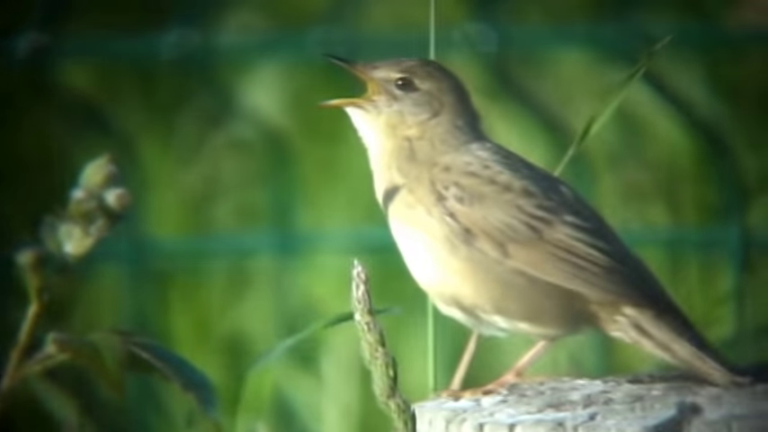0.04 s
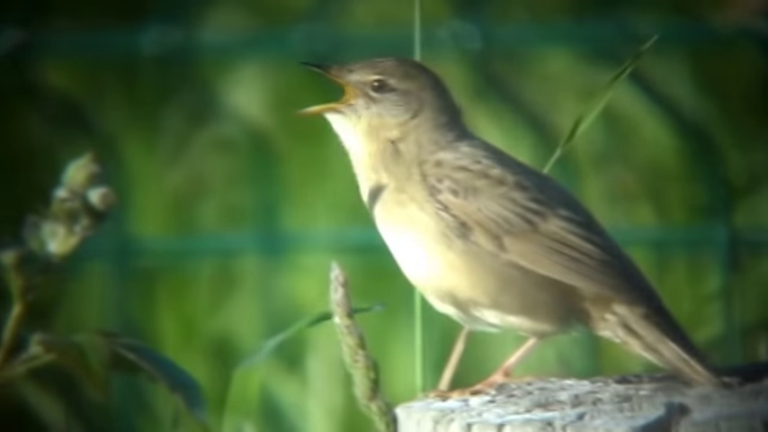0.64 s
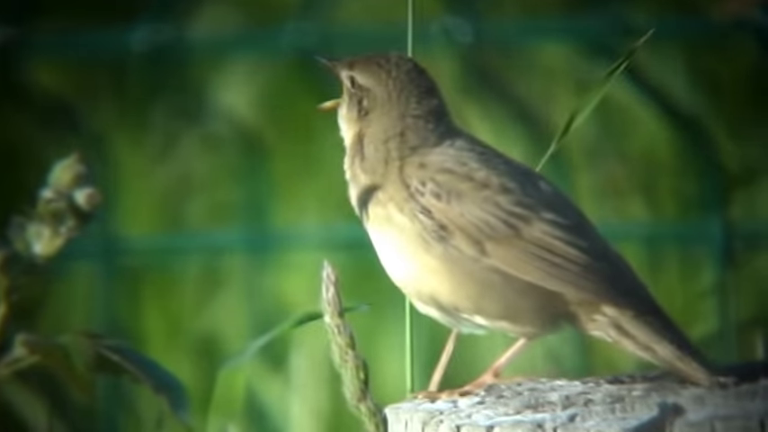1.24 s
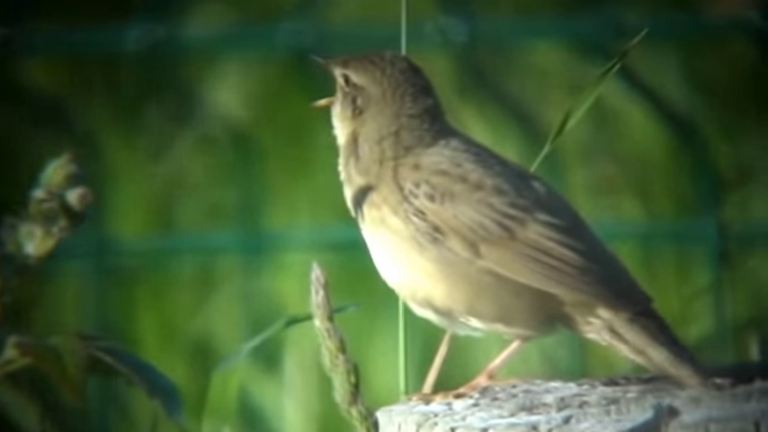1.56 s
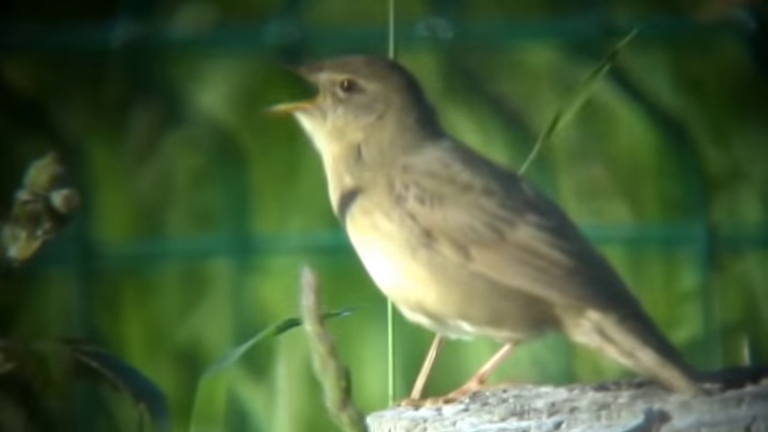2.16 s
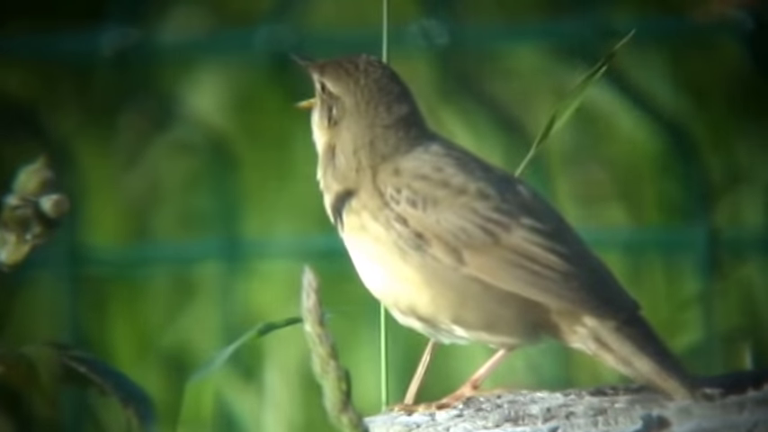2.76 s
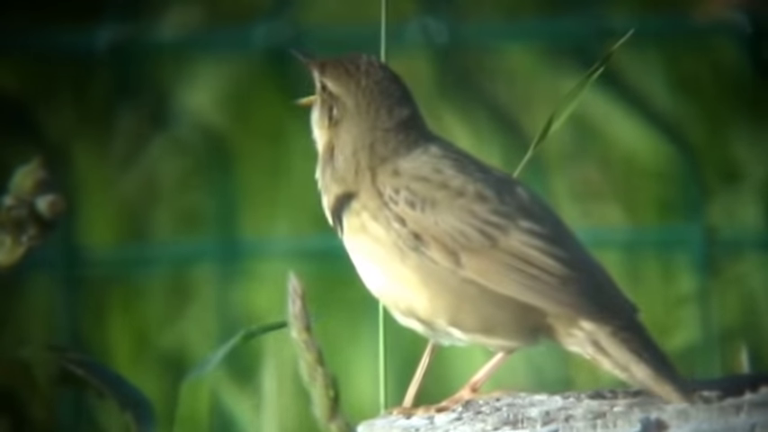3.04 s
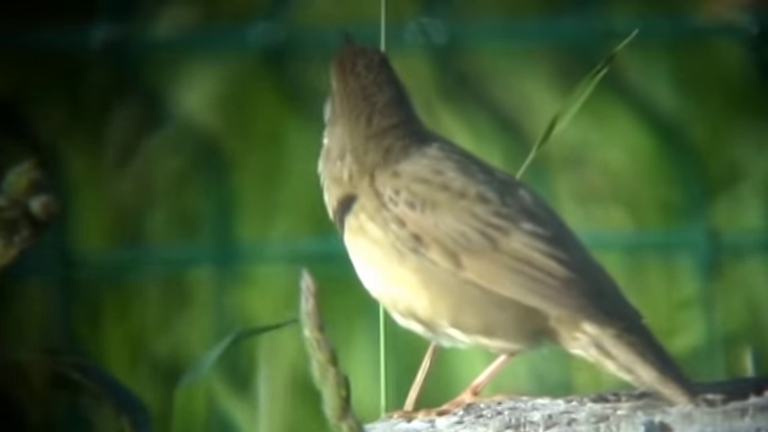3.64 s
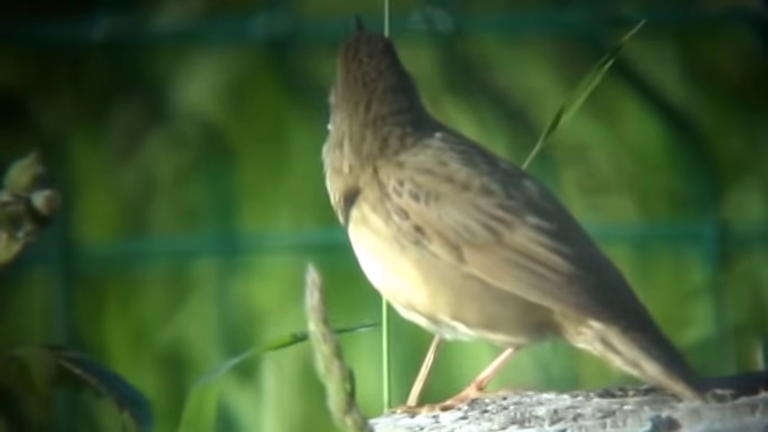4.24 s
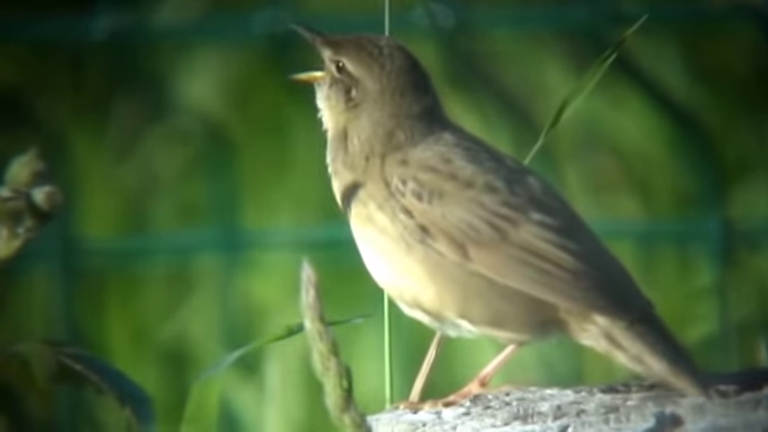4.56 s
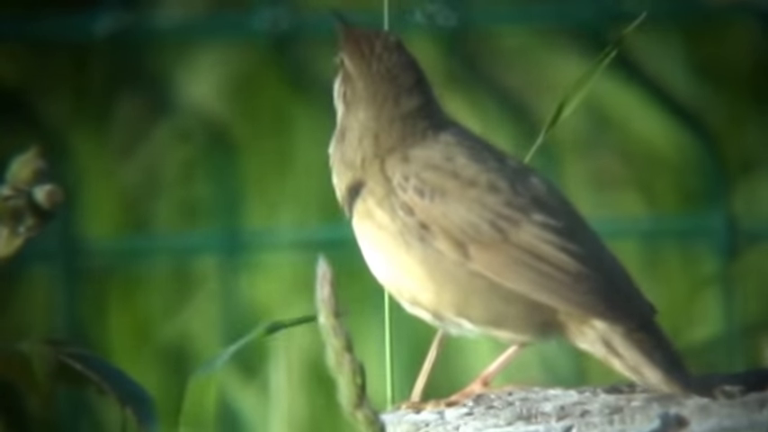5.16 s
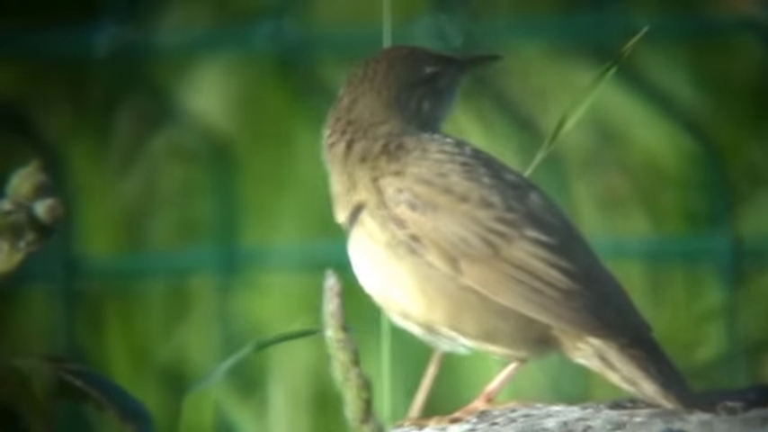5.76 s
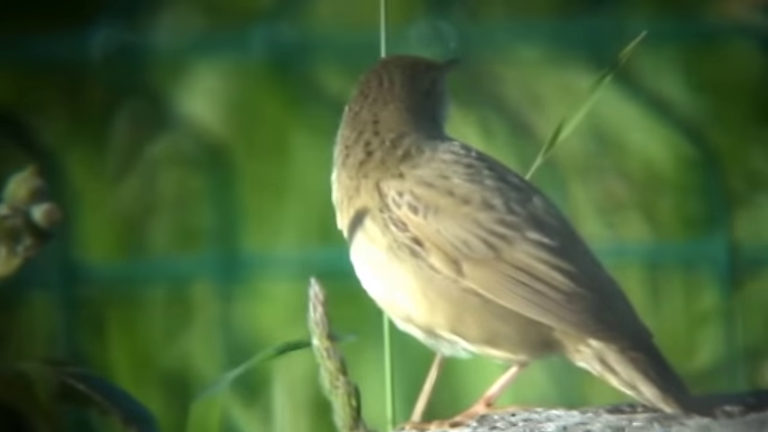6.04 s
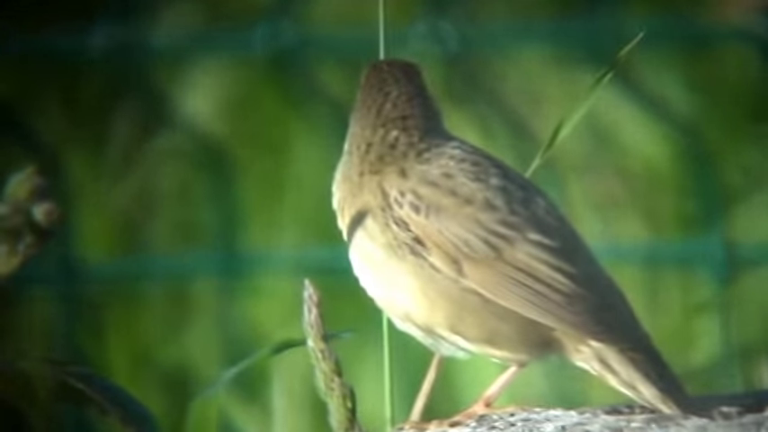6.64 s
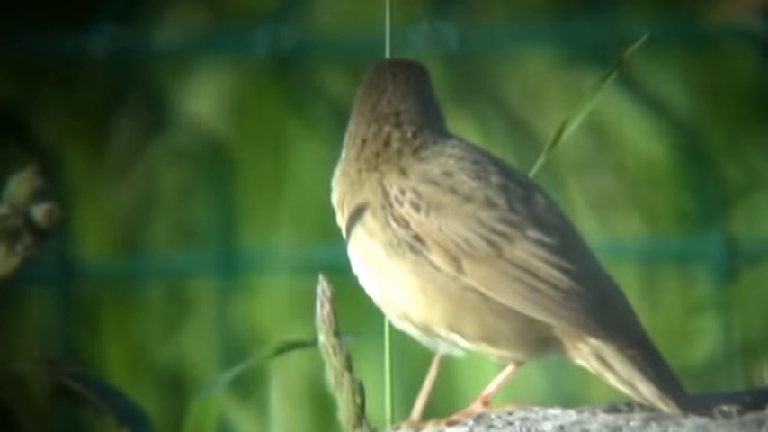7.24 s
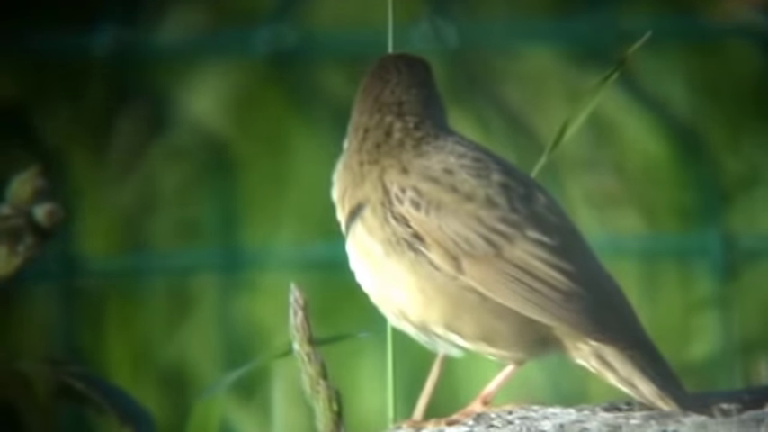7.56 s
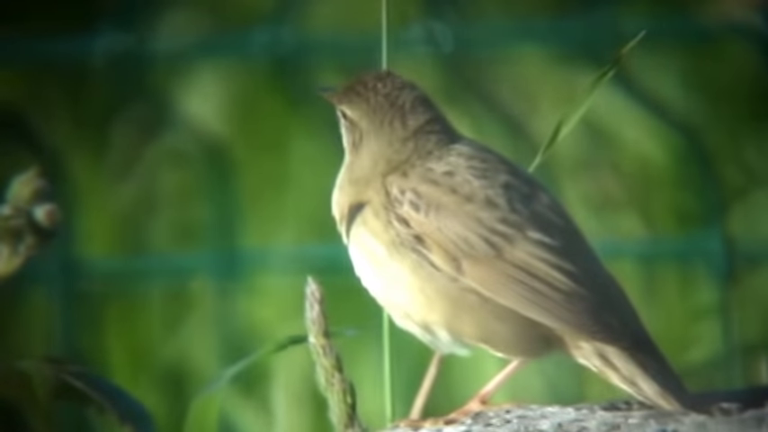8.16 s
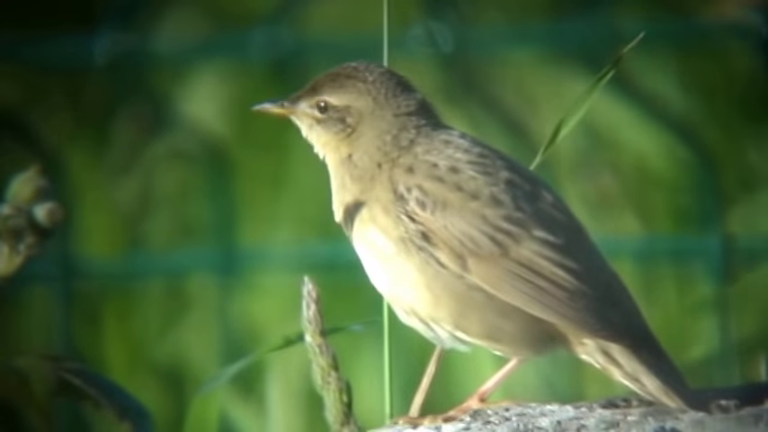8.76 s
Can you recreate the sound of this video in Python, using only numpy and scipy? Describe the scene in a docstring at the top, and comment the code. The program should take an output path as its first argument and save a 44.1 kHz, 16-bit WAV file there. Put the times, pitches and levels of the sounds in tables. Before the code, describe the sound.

From the very start, a small warbler sings close by in a meadow: a high, fast, unbroken trill of tiny ticks, even and mechanical like an insect or a spinning reel. It softens slightly after the first second but keeps its pace. At about 1.6 seconds a single sharp, dry knock sounds nearby, a little to the right, and a much fainter one follows at about 2.7 seconds. The trill stops at about 5.4 seconds. Other birds call faintly far away throughout, with short rising chirps, falling whistles and small twitters near 4.6 and 5.9 seconds, continuing until about 8 seconds. Under everything lie a low distant rumble, a soft steady wash of open air and faint microphone hiss. The rumble swells slightly around 7.5 and 8 seconds, and this quiet background lasts to the end at about 9 seconds.

```python
"""Warbler reeling in a meadow.

A warbler's syrinx pulses out 27 syllables a second, each a sharp rising tick and a short falling note.
The song scatters off the plants and stops after 5.4 s. Other birds whistle far off. Something knocks
nearby, then again faintly. Under it all: distant rumble, open-air wash, faint microphone hiss and whine."""
import sys
import numpy as np
from scipy import signal
from scipy.fft import rfft, irfft, next_fast_len
from scipy.io import wavfile

SR = 44100
rng = np.random.default_rng(int(sys.argv[2]) if len(sys.argv) > 2 else 0)


def store_pcm(level_fs):
    """Save levels as 16-bit WAV."""
    pcm = np.round(np.clip(level_fs, -1, 1) * 32767).astype(np.int16)
    wavfile.write(sys.argv[1], SR, np.atleast_2d(pcm).T)


N = 396459
TIME_S = np.arange(N) / SR

# tick gesture: offset_s, pitch_hz, gain_db
TICK = [(-.0013, 3850, -30.5), (-.00085, 4770, -11), (-.00045, 6500, -2), (0, 6700, -1.5),
        (.00045, 6850, -3.5), (.00085, 7000, -9.5), (.0012, 8000, -20), (.0018, 8300, -44)]
# note gesture: offset_s, bend_hz, gain_db
NOTE = [(-.0007, 400, -29), (-.0001, 256, -1), (.0006, 117, 1), (.002, 42, 3), (.0033, -70, -2),
        (.0044, -230, -8), (.0058, -320, -21.5)]
# tick tuning, sinking late in the song: time_s, shift_hz
TICK_SHIFT = [(0, -32), (.5, 68), (1.2, -33), (2.3, 33), (3.7, -73), (4.1, -200), (4.7, -130), (5.4, -130)]
# note tuning, sagging at the end: time_s, pitch_hz
NOTE_PITCH = [(0, 5890), (.7, 5940), (1.4, 5870), (2.4, 5940), (3.9, 5870), (4.25, 5830), (4.5, 5880),
              (5.4, 5800)]
# reel rate: time_s, syllables_per_s
PACE = [(0, 27.59), (.68, 27.44), (.7, 27.69), (2.57, 27.29), (2.6, 27.52), (4.12, 27.2), (4.85, 27.44),
        (5.08, 27.35), (5.4, 26.56)]
# song level, dipping as the beak turns away: time_s, tick_db, note_db
SONG_LEVEL = [(0, -32.5, -38), (.31, -29, -37.5), (1.05, -31, -37.7), (1.22, -34.4, -39.9),
              (1.55, -34.5, -41), (2.11, -31.5, -37.5), (2.6, -32, -38), (2.679, -33.5, -39),
              (3.5, -33, -38.5), (4.411, -33, -37), (4.94, -33.9, -39.5), (5.15, -33, -38),
              (5.4, -33.5, -40)]
# forward-beamed octave, fading as the head turns: time_s, gain_db
OCTAVE_BEAM = [(1.0, -1), (1.3, -3.5)]
# return from the plants, growing as the head turns: time_s, gain_db
PLANT_SCATTER = [(0, -17), (1.1, -14.5), (2.5, -13.5), (4, -11), (5.4, -10.5)]

# far contact calls, upward hooks: start_s, start_hz, level_db
HOOKS = [(.575, 3480, -69.5), (2.095, 3560, -68), (2.887, 3430, -69), (5.42, 3430, -74), (6.08, 3520, -76),
         (6.175, 3420, -68), (6.723, 3780, -74), (7.04, 3410, -71), (7.15, 3410, -73), (7.28, 4430, -78),
         (7.57, 3750, -73.5), (7.98, 3430, -77), (8.08, 4400, -76)]
# far falling slurs: start_s, length_s, start_hz, end_hz, level_db
SLURS = [(.38, 0.2, 5200, 4300, -74), (2.249, 0.17, 3950, 2950, -74), (2.98, .15, 4900, 4200, -73),
         (3.582, .17, 4600, 3130, -72), (4.324, 0.11, 4960, 4500, -73), (4.821, .26, 4550, 2870, -68),
         (5.575, .17, 5050, 4280, -68.5)]
# far held notes, flat-topped arches: start_s, length_s, top_hz, level_db
ARCHES = [(3.087, .08, 4040, -73), (3.19, .065, 4020, -71.5), (3.286, 0.064, 4040, -73),
          (3.5, .1, 3150, -69), (3.859, .175, 3220, -67.5), (4.09, .11, 3090, -71)]
# far twitters: start_s, level_db
TWITTERS = [(4.648, -61), (5.923, -64)]
# pips of one twitter: pitch_hz, gain_db
PIPS = [(3660, -2), (3740, -2), (3380, 1), (3150, 1), (2870, -5)]

# knocks: start_s, level_db
KNOCKS = [(1.5983, -25), (2.696, -41)]
# modes of the knocked object: freq_hz, gain_db, t60_s
KNOCK_MODES = [(470, -40, .04), (652, -9.5, 0.043), (926, 3.5, 0.02), (1250, 4, 0.0097), (1480, -3, 0.013),
               (2510, -8, 0.0049)]

# distant rumble spectrum: freq_hz, relative_db
RUMBLE = [(18, -44), (35, -14), (60, -4), (100, -0.5), (135, 0.5), (175, -4.5), (220, -12.5), (280, -9),
          (380, -22.5), (700, -45.5)]
# rumble swells: centre_s, half_width_s, rise_db
RUMBLE_SWELLS = [(2.0, .2, 2.5), (7.488, 0.071, 3.5), (8.05, 0.095, 4.5)]
# open-air wash spectrum: freq_hz, relative_db
WASH = [(200, -8.5), (420, -2), (540, -2), (700, -1), (930, 3), (1150, -2.5), (1500, -5.5), (2000, -9),
        (2800, -15), (4000, -19), (7000, -33)]
# wash envelope: time_s, level_db
WASH_LEVEL = [(0.0, -55.5), (1.0, -55.5), (1.78, -56.5), (3.88, -55.5), (7.34, -58), (8.99, -57.5)]
# far drones: centre_s, half_width_s, centre_hz, bandwidth_hz, level_db
DRONES = [(0.395, 1.6, 1800, 391, -69), (.7, 0.49, 907, 69.4, -64.5), (4.5, 1.5, 654.5, 43.5, -63),
          (6.9, 0.79, 462, 41.2, -67.5), (8.15, 0.99, 1260, 110, -65.5), (8.2, 1, 2050, 200, -70.5)]
# likeness of outdoor noise between the ears: freq_hz, coherence
AIR_COHERENCE = [(75, .94), (140, .98), (300, .83), (600, .6), (1100, .3), (2000, .1), (5000, .05)]
# balance of outdoor noise: freq_hz, left_minus_right_db
AIR_BALANCE = [(100, -0.2), (300, 0), (700, -1.5), (1200, -4.5), (2500, -4.5), (5000, -0.5)]

# hiss common to both channels: freq_hz, relative_db
COMMON_HISS = [(2000, -4.5), (6000, -2), (9000, 2.5), (12500, 5.5), (13500, 4), (16000, -3.5)]
# hiss of each channel alone: freq_hz, relative_db
CHANNEL_HISS = [(2500, -2), (5000, 4), (8000, 4.5), (11000, -2), (12500, -35), (16000, -33)]
# electronic tone comb: freq_hz, level_db
WHINE = [(5000, -89), (6000, -87), (7000, -89), (8000, -91), (9000, -92), (10000, -89), (11000, -84),
         (12000, -80), (13000, -83), (14000, -89)]


def warbler(note_lag_s=0.01, lag_spread_s=0.00015, ground_s=0.00749, ground_db=-21):
    """Alternating ticks and notes, with a weak ground echo and a short haze from the plants."""
    ticks, notes = np.zeros((2, N))
    knots_s, tick_curve_db, note_curve_db = np.transpose(SONG_LEVEL)
    for start_s in syllable_times():
        tick_db = np.interp(start_s, knots_s, tick_curve_db) + rng.normal(0, 0.9)
        note_db = np.interp(start_s, knots_s, note_curve_db) + rng.normal(0, 0.46)
        shift_hz = at_time(TICK_SHIFT, start_s) + rng.normal(0, 40)
        note_hz = at_time(NOTE_PITCH, start_s) + rng.normal(0, 45)
        note_s = start_s + rng.normal(note_lag_s, lag_spread_s)
        beam_db = at_time(OCTAVE_BEAM, start_s)
        tick = syrinx_pulse(TICK, shift_hz, tick_db, octave_db=beam_db - 21, waver_hz=99, rough=0.07)
        note = syrinx_pulse(NOTE, note_hz, note_db, octave_db=beam_db - 21.5, waver_hz=52.6, rough=0.09)
        add(ticks, start_s + TICK[0][0], tick)
        add(notes, note_s + NOTE[0][0], note)
    direct = ticks * pan(balance_db=-1.3) + notes * pan(balance_db=4.5)
    haze = from_db(at_time(PLANT_SCATTER)) * scatter(ticks + from_db(2) * notes, t60_s=0.19, gap_s=0.0021)
    return direct + haze + from_db(ground_db) * delayed(ticks + notes, ground_s)


def syllable_times(first_s=0.0005, end_s=5.42):
    """One syllable per cycle of the reel."""
    t = TIME_S[TIME_S < end_s]
    cycles = np.cumsum(at_time(PACE, t)) / SR
    return first_s + np.interp(np.arange(int(cycles[-1]) + 1), cycles, t)


def syrinx_pulse(gesture, shift_hz, level_db, octave_db, waver_hz, rough):
    """A gliding, slightly rough sine with a weak octave."""
    knots_s, curve_hz, curve_db = np.transpose(gesture)
    t = np.arange(knots_s[0], knots_s[-1], 1 / SR)
    pitch_hz = np.interp(t, knots_s, curve_hz) + shift_hz + waver_hz * wobble(len(t), rate_hz=2350)
    phase = 2 * np.pi * (np.cumsum(pitch_hz) / SR + rng.random())
    envelope = from_db(level_db + np.interp(t, knots_s, curve_db))
    envelope *= 1 + rough * wobble(len(t), rate_hz=1000)
    return envelope * (np.sin(phase) + from_db(octave_db) * np.sin(2 * phase))


def far_birds(hook_s=0.093, hook_rise_hz=505, arch_drop_hz=300, arch_drop_s=0.08):
    """Twitters, rising calls, falling slurs and held notes, blurred by distance."""
    calls = twitters()
    for start_s, start_hz, level_db in HOOKS:
        add(calls, start_s, whistle(start_hz + hook_rise_hz * progress(hook_s) ** 2, level_db))
    for start_s, length_s, start_hz, end_hz, level_db in SLURS:
        fall = (1 - progress(length_s)) ** 1.5
        add(calls, start_s, whistle(end_hz + (start_hz - end_hz) * fall, level_db))
    for start_s, length_s, top_hz, level_db in ARCHES:
        from_top = np.abs(progress(length_s) - 0.5) * length_s / arch_drop_s
        add(calls, start_s, whistle(top_hz - arch_drop_hz * from_top ** 3, level_db))
    direct = from_db(-2) * calls * pan(balance_db=-4.5)
    return direct + from_db(-9) * scatter(calls, t60_s=0.3, gap_s=0.01)


def twitters(step_s=0.022, pip_s=0.013, rise_hz=550):
    """Runs of rising pips that tumble down in pitch."""
    out, u = np.zeros(N), progress(pip_s)
    for start_s, level_db in TWITTERS:
        for k, (pitch_hz, gain_db) in enumerate(PIPS):
            phase = 2 * np.pi * np.cumsum(pitch_hz + rise_hz * (u - 0.5)) / SR
            pip = from_db(level_db + gain_db) * np.sin(np.pi * u) * np.sin(phase)
            add(out, start_s + k * step_s - pip_s / 2, pip)
    return out


def whistle(pitch_hz, level_db, flutter_db=5.0, waver_hz=25):
    """An unsteady sine with soft ends."""
    size = len(pitch_hz)
    swell = np.sin(np.linspace(0, np.pi, size)).clip(0) ** (1 / 3)
    phase = 2 * np.pi * np.cumsum(pitch_hz + waver_hz * wobble(size, rate_hz=152)) / SR
    return from_db(level_db + flutter_db * wobble(size, rate_hz=69)) * swell * np.sin(phase)


def knocks(attack_s=0.00045, crack_t60_s=0.013, echo_s=0.0032, far_ear_s=0.00084):
    """Dry knocks to one side: damped modes and a crack, one hard reflection, a short tail."""
    t, hits = TIME_S[:SR // 5], np.zeros(N)
    ring = sum(from_db(db - 60 * t / t60_s) * np.sin(2 * np.pi * hz * t) for hz, db, t60_s in KNOCK_MODES)
    crack = signal.sosfilt(signal.butter(2, 5000, fs=SR, output="sos"), rng.standard_normal(len(t)))
    knock = ring * (1 - np.exp(-t / attack_s)) + from_db(-13 - 60 * t / crack_t60_s) * crack
    for start_s, level_db in KNOCKS:
        add(hits, start_s, from_db(level_db) * knock)
    hits += from_db(-23) * delayed(hits, echo_s)
    direct = np.array([hits, delayed(hits, far_ear_s)]) * pan(balance_db=-3.2)
    return direct + from_db(-6) * scatter(hits, t60_s=0.03, gap_s=0.0044)


def rumble(level_db=-53.5):
    """Low distant noise with brief swells."""
    swell_db = sum(rise_db * bump(centre_s, half_s) for centre_s, half_s, rise_db in RUMBLE_SWELLS)
    return from_db(level_db + swell_db) * air_noise(RUMBLE)


def wash():
    """Broad, nearly steady noise of the open air."""
    return from_db(at_time(WASH_LEVEL)) * air_noise(WASH)


def drones():
    """Far, narrow noise bands that swell and fade."""
    out = np.zeros((2, N))
    for centre_s, half_s, centre_hz, width_hz, level_db in DRONES:
        edges_hz = [centre_hz - width_hz / 2, centre_hz + width_hz / 2]
        band = signal.butter(2, edges_hz, "band", fs=SR, output="sos")
        common, left, right = signal.sosfilt(band, rng.standard_normal((3, N)))
        drone = unit_rms(common + 0.58 * np.array([left, right])) * pan(at_hz(AIR_BALANCE, centre_hz))
        out += from_db(level_db) * bump(centre_s, half_s) * drone
    return out


def microphone_hiss(level_db=-66):
    """Self-noise, part common and part per channel."""
    size = next_fast_len(N, True)
    hz = np.fft.rfftfreq(size, 1 / SR)
    common, left, right = rfft(rng.standard_normal((3, size)))
    separate = np.array([left, right]) * from_db(at_hz(CHANNEL_HISS, hz))
    hiss = irfft(common * from_db(at_hz(COMMON_HISS, hz)) + separate)[:, :N]
    return from_db(level_db) * unit_rms(hiss)


def microphone_whine(flutter_hz=100):
    """Thin electronic tones; flutter adds sidebands."""
    comb = sum(from_db(db) * np.sin(2 * np.pi * (hz * TIME_S + rng.random())) for hz, db in WHINE)
    return np.sqrt(2) * comb * (1 + np.sin(2 * np.pi * flutter_hz * TIME_S))


def air_noise(spectrum):
    """Stereo outdoor noise, coherent in the bass and diffuse in the treble."""
    size = next_fast_len(N, True)
    hz = np.fft.rfftfreq(size, 1 / SR)
    mid, side = rfft(rng.standard_normal((2, size)))
    coherence = np.clip(at_hz(AIR_COHERENCE, hz), 0, 1)
    ears = np.sqrt(1 + coherence) * mid + np.sqrt(1 - coherence) * side * [[1], [-1]]
    noise = irfft(ears * from_db(at_hz(spectrum, hz)) * pan(at_hz(AIR_BALANCE, hz)))[:, :N]
    return noise / noise.mean(0).std()


def scatter(x, t60_s, gap_s):
    """Dense weak reflections off leaves and stalks, separate for each ear."""
    t = TIME_S[:SR // 2]
    echoes = rng.standard_normal((2, len(t))) * from_db(-60 * t / t60_s) * (t > gap_s)
    echoes /= np.sqrt((echoes ** 2).sum(1, keepdims=True))
    return signal.fftconvolve(np.atleast_2d(x), echoes, axes=1)[:, :N]


def delayed(x, delay_s):
    """Fractional delay."""
    return np.interp(TIME_S - delay_s, TIME_S, x, left=0)


def wobble(size, rate_hz):
    """Random curve through Gaussian knots."""
    knots = rng.standard_normal(512)
    return np.interp(np.arange(size) / SR * rate_hz, np.arange(512), knots)


def progress(length_s):
    """Ramp from 0 to 1."""
    return np.linspace(0, 1, int(length_s * SR))


def bump(centre_s, half_s):
    """Bell curve, peak 1."""
    return np.exp(-((TIME_S - centre_s) / half_s) ** 2)


def at_time(rows, time_s=TIME_S):
    """Interpolate in time."""
    return np.interp(time_s, *np.transpose(rows))


def at_hz(rows, hz):
    """Interpolate in log frequency."""
    knots_hz, values = np.transpose(rows)
    return np.interp(np.log(hz + 1), np.log(knots_hz), values)


def from_db(db):
    """Decibels to gain."""
    return 10 ** (np.asarray(db) / 20)


def unit_rms(x):
    """Scale to unit power."""
    return x / np.sqrt(np.mean(x ** 2) + 1e-20)


def pan(balance_db):
    """Stereo gains; positive is left."""
    return from_db(np.array([[0.5], [-0.5]]) * balance_db)


def add(track, start_s, sound):
    """Mix into a track in place."""
    start = max(int(start_s * SR), 0)
    part = track[..., start:start + sound.shape[-1]]
    part += sound[..., :part.shape[-1]]


def scene():
    """Meadow plus microphone noise, in stereo."""
    meadow = warbler() + far_birds() + knocks() + rumble() + wash() + drones()
    return meadow + microphone_hiss() + microphone_whine()


def record(dry):
    """Steep low-pass at 16 kHz."""
    lowpass = signal.firwin(401, 16000, fs=SR, window="blackman")
    return signal.fftconvolve(dry, lowpass[None], "same", axes=1)


dry = scene()
out = record(dry)
store_pcm(out)
```